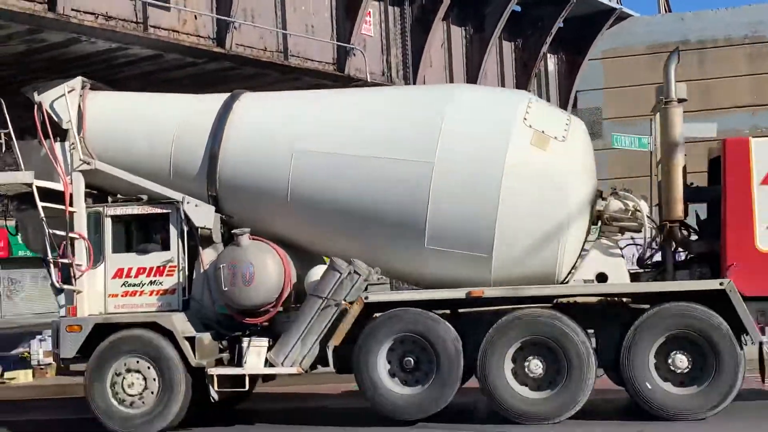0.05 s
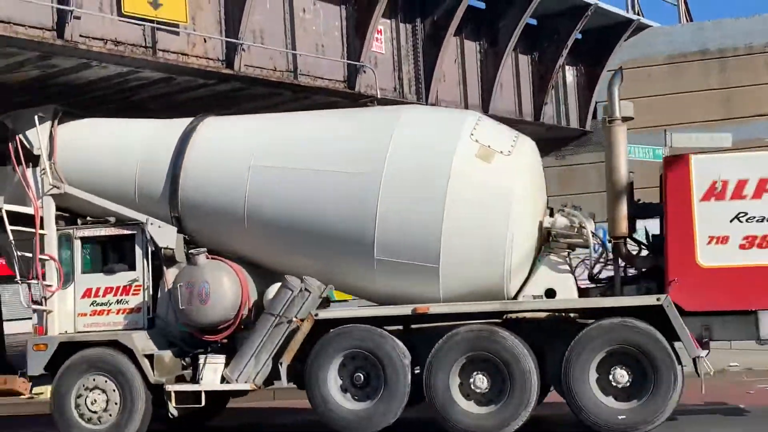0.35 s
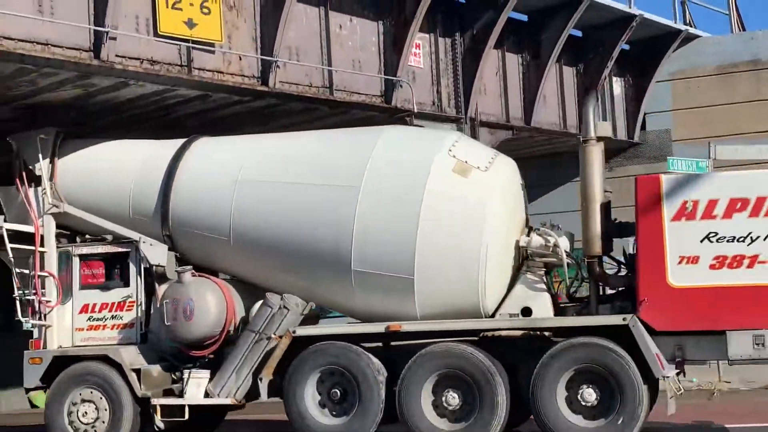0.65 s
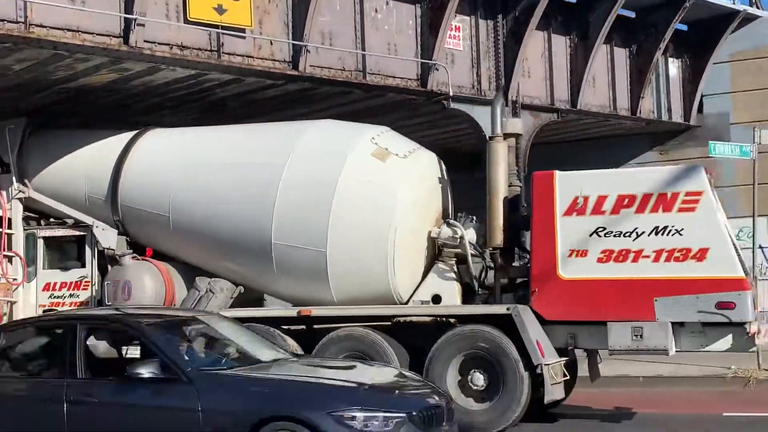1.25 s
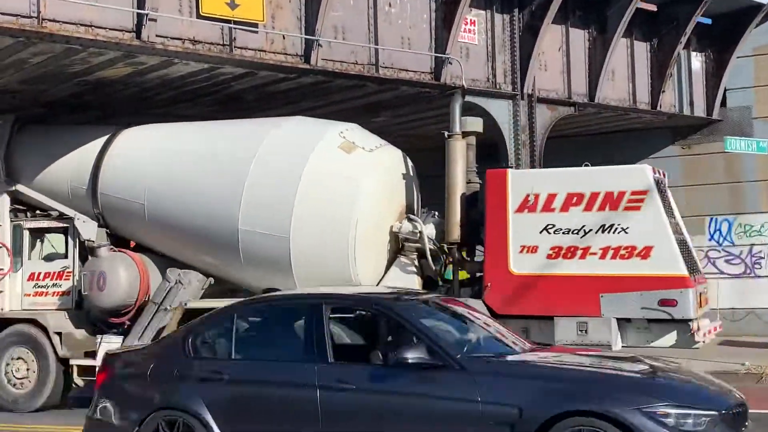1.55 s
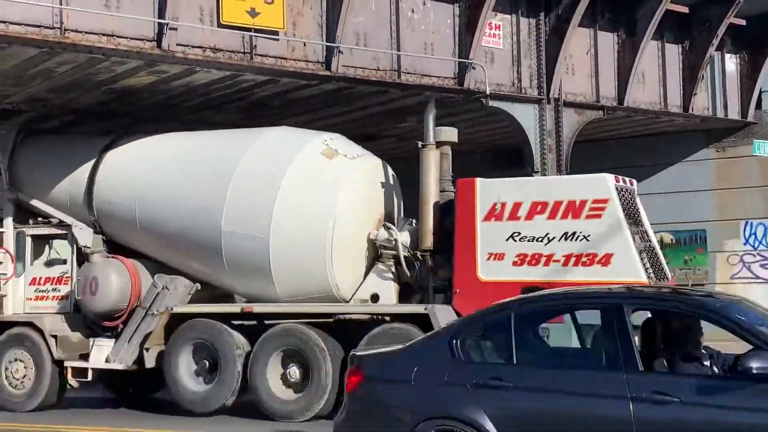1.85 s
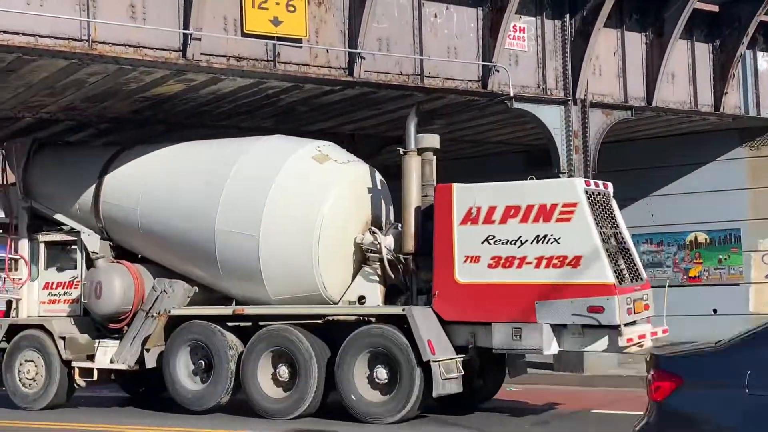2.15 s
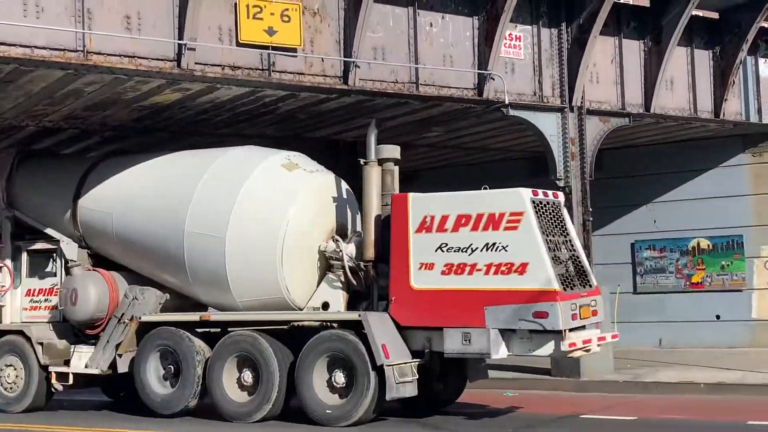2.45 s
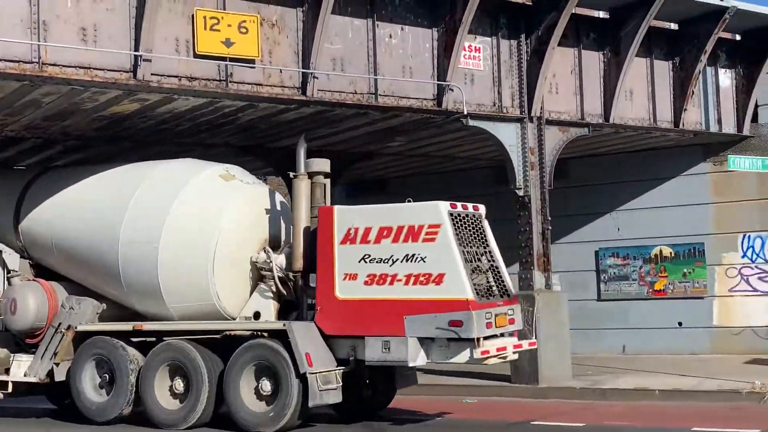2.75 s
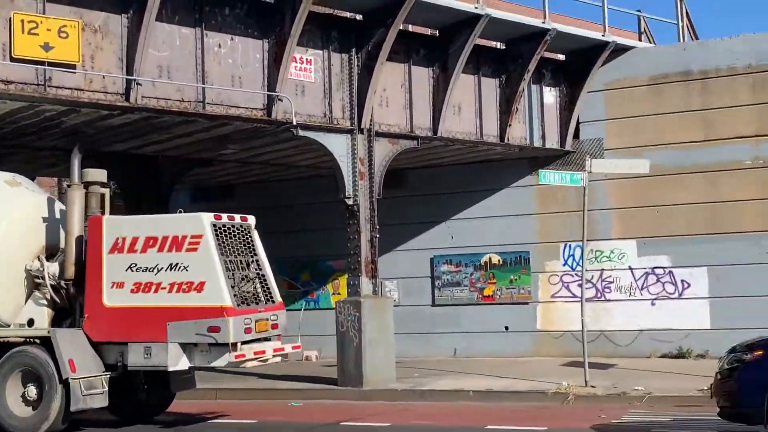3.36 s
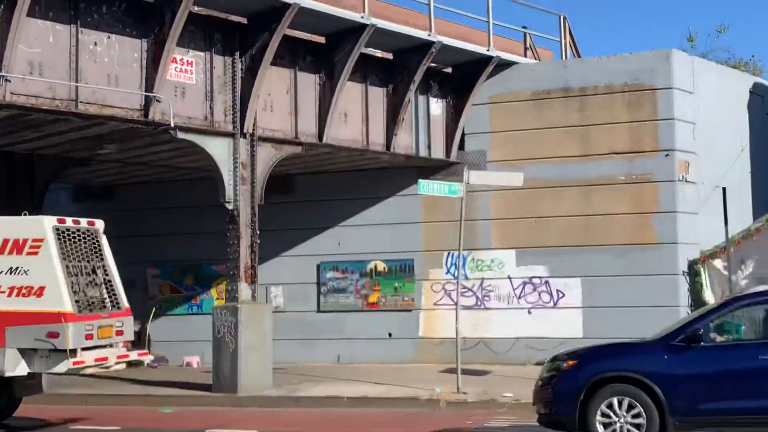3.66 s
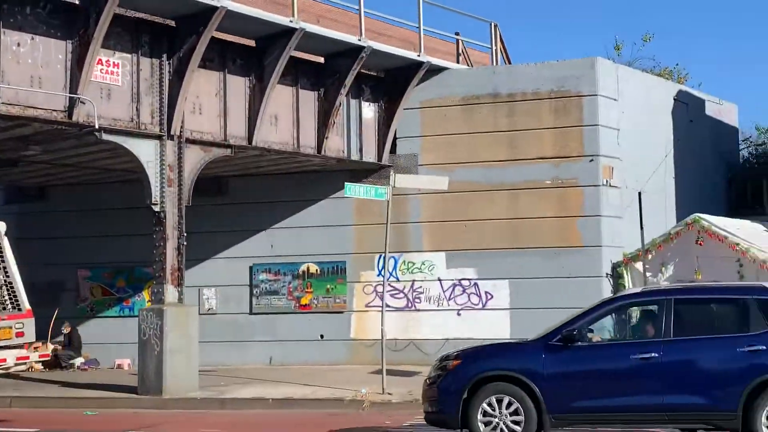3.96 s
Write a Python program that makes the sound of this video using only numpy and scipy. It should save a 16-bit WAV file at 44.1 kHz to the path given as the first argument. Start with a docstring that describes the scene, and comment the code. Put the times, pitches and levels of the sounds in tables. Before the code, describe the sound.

A heavy truck's engine throbs and rattles over tyre noise on a street under an overpass. Heard from the roadside, a car burbles past with sharp pops, followed by an air hiss, faint brake squeal and a second car's hum.

```python
"""A deep exhaust throb and engine clatter over road rumble: a diesel mixer truck rolls slowly past.
Its firings make the throb and pulse the engine noise; loose steel rattles, brakes squeal, air hisses.
A saloon overtakes close by, its burble and pops exciting the resonances of silencer and tailpipe,
and a second car hums and whines in at the end. Tyre noise fills the street, and a steel overpass
reflects the engines and rattles, all heard from a phone on the pavement."""
import sys
import numpy as np
from scipy import signal
from scipy.fft import rfft, irfft
from scipy.io import wavfile

SR = 44100
rng = np.random.default_rng(int(sys.argv[2]) if len(sys.argv) > 2 else 0)


def store_wav(level_fs):
    """Save 16-bit WAV to argv[1]."""
    pcm = np.round(np.clip(np.atleast_2d(level_fs), -1, 1) * 32767)
    wavfile.write(sys.argv[1], SR, pcm.T.astype(np.int16))


N = 176400
T = np.arange(N) / SR
FREQ = np.maximum(np.arange(N // 2 + 1) * SR / N, 1)
CAR_WOBBLE, TICK_RISE_S = .005, .0017  # fractional pitch drift of the cars; rise of a knock or tick

# truck exhaust: t/s, firing f/Hz, fundamental level/dB, overtone level/dB
TRUCK_EXHAUST = [(0, 64.9, -26, -33), (.6, 63.55, -24.5, -32.5), (1.05, 62.86, -24.5, -26),
                 (1.65, 61.38, -25, -26), (2.3, 60.4, -28.5, -30), (2.8, 59.9, -32.5, -30.5),
                 (4, 58.94, -41, -36)]
# road rumble, tyre roar, and fan and tyre hiss: t/s, level/dB
RUMBLE_LEVEL = [(0, -25.5), (.9, -23), (2.05, -23.5), (2.6, -22), (3.1, -24), (3.5, -22), (4, -26.5)]
ROAR_LEVEL = [(0, -30), (.5, -31), (1, -28.5), (1.5, -30), (2.6, -31.5), (3.2, -32), (3.6, -35)]
HISS_LEVEL = [(0, -39), (1.05, -36), (1.95, -40), (2.15, -35), (2.7, -37.5), (3.1, -39.5), (3.6, -38)]
# their spectra: f/Hz, relative spectral level/dB
RUMBLE_SPECTRUM = [(15, -26), (25, -19), (42, 1), (60, -3.5), (100, 1.5), (140, -4.5), (200, -2.5),
                   (260, -10.5), (340, -13), (450, -15.5), (700, -19), (1500, -63)]
ROAR_SPECTRUM = [(100, -65), (300, 0.5), (520, -4), (660, -1.5), (830, 2), (1050, -1.5), (1400, -8.5),
                 (1900, -7.5), (2600, -12), (3300, -18.5), (5000, -24), (9000, -35.5)]
HISS_SPECTRUM = [(1000, -6.5), (2500, 4.5), (3400, 2), (4250, 4), (5400, -4), (7000, -0.5), (9800, -7.5),
                 (12300, -14.5), (15000, -48)]
# coherence of the street noise: f/Hz, left-right correlation
STREET_COHERENCE = [(30, 0.84), (150, 0.81), (300, 0.92), (550, 0.44), (1000, 0), (2000, 0.19),
                    (4000, 0.088)]
# resonances of the engine and its cover: f/Hz, width/Hz, relative level/dB
BLOCK_MODES = [(341, 83, 5.5), (795, 120, 0.5), (1225, 66, -3.5), (1605, 110, 0.5), (1762, 82, -5),
               (2650, 160, -12), (4360, 99, -9.5)]
# engine noise, louder once the rear grille faces the pavement: t/s, level/dB
ENGINE_LEVEL = [(0, -36), (1, -38), (1.7, -42.5), (2.3, -34.5), (3.2, -37), (4, -40)]
# loose chains and chutes: t/s, level/dB
JINGLE_LEVEL = [(0, -55.5), (1.9, -60), (2.2, -53), (3.4, -57)]
# overtaking saloon: t/s, firing f/Hz of one cylinder bank, level/dB
SALOON_DRONE = [(.85, 66, -47), (1.06, 65.4, -20.5), (1.45, 63.4, -28.5), (1.87, 62.48, -22.5),
                (2.15, 58, -64)]
# exhaust burbles: t/s, nominal length/s, boom level/dB, bark level/dB, bark f/Hz, bark spread/octaves
EXHAUST_BURBLES = [(1.048, 0.062, -17, -23.5, 700, 0.43), (1.102, 0.087, -17, -30, 754, 0.42),
                   (1.232, 0.079, -20.5, -32, 640, 0.81), (1.31, 0.06, -14, -24.5, 754, 0.21),
                   (1.386, 0.024, -21, -22, 850, 0.54), (1.479, 0.09, -18.5, -30, 640, 0.12),
                   (1.528, 0.04, -18.5, -25.5, 744, 0.17), (1.594, 0.048, -17, -24.5, 610, 0.49),
                   (1.666, 0.03, -22.5, -35, 650, 0.33), (1.749, 0.042, -19, -25.5, 530, 0.85),
                   (1.792, 0.065, -19.5, -27.5, 460, 0.29), (1.877, 0.058, -21, -29, 670, 0.12)]
# silencer boom: f/Hz, relative spectral level/dB
SILENCER_SPECTRUM = [(15, -52), (70, -11), (120, 1), (200, 1), (255, -8), (350, -17), (600, -33),
                     (1200, -78)]
# tailpipe resonances: f/Hz, width/Hz, relative level/dB
TAILPIPE_MODES = [(452, 28, 1), (652, 28, 2), (745, 110, -6), (885, 90, -4)]
# soft, deep thumps and air buffets as the traffic passes: t/s, f/Hz, level/dB
LOW_THUMPS = [(1.33, 68.8, -25), (1.58, 43.88, -20), (1.705, 51.2, -16), (1.9, 75.3, -20),
              (3.82, 105.4, -17)]
# chassis rattles: t/s, level/dB, centre f/Hz, decay/s
CHASSIS_RATTLES = [(1.386, -31, 8900, .003), (1.683, -38, 6600, .003), (3.01, -34.5, 7500, .014),
                   (3.11, -37.5, 10200, .016), (3.152, -37.5, 8410, 0.012), (3.333, -36, 7000, 0.026),
                   (3.425, -35.5, 7000, 0.012), (3.749, -36.5, 6960, 0.0039), (3.982, -35, 7400, 0.0091)]
# single loud exhaust pops: t/s, pipe resonance f/Hz, level/dB
EXHAUST_POPS = [(1.388, 645, -31), (1.392, 449, -20.5), (1.524, 654, -12.5), (1.606, 451, -16)]
# second car: t/s, firing f/Hz, level/dB at f, level/dB at 1.5 f, level/dB at 2 f
CAR_ORDERS = [(2.1, 77.84, -55, -60, -38), (2.65, 78.5, -41, -57, -27), (3.0, 79.34, -32, -62, -57),
              (3.35, 79.76, -26.5, -42, -46), (3.55, 80.27, -26, -36, -26), (4, 82.4, -30, -32, -30)]
# its gear whine, rising as it pulls away: t/s, f/Hz, level/dB
GEAR_WHINE = [(2.9, 297.4, -63), (3.12, 323.4, -35), (3.45, 376, -41), (3.75, 392, -62)]
# brake squeals: t/s, hold/s, f/Hz, level/dB, fade/(dB/s), fractional pitch waver
BRAKE_SQUEALS = [(2.363, 0.11, 6950, -44, 25, 0.001), (2.519, 0.82, 9150, -43.5, 8, 0.00308),
                 (3.469, .12, 9070, -54, 25, .003), (2.467, .12, 15650, -46, 60, 0.005),
                 (3.599, .07, 14800, -45, 90, .012)]
# escaping brake air: f/Hz, relative spectral level/dB
AIR_SPECTRUM = [(1500, 2.5), (7000, -4), (10000, -6.5), (12500, -13)]
# balance of the phone's microphones: f/Hz, left minus right level/dB
MIC_BALANCE = [(110, -.6), (300, 1.3), (2500, 1.1), (3700, -.4), (5700, -3), (7200, 0)]


def undb(db):
    """Amplitude ratio of a level in decibels."""
    return 10 ** (np.asarray(db) / 20)


def unit(x):
    """Normalisation to rms 1."""
    return x / np.sqrt(np.mean(x ** 2))


def curve(rows):
    """Linear interpolation in time of each column of a table."""
    times, *columns = np.array(rows).T
    return [np.interp(T, times, c) for c in columns]


def across(rows):
    """Interpolation of a table over log frequency."""
    hz, value = np.array(rows).T
    return np.interp(np.log(FREQ), np.log(hz), value)


def shape(x, gain):
    """Filtering by multiplication of the spectrum."""
    return irfft(rfft(x) * gain, N)


def hump(hz, octaves):
    """Gaussian passband in log frequency."""
    return np.exp(-.5 * (np.log2(FREQ / hz) / octaves) ** 2)


def resonance(hz, width):
    """Response of a damped oscillator, 1 at its peak."""
    return 1 / (1 + 1j * (FREQ / hz - hz / FREQ) * hz / width)


def drift(rate_hz):
    """Low-pass noise: a smooth fluctuation of rms 1."""
    return unit(shape(rng.standard_normal(N), np.exp(-.5 * (FREQ / rate_hz) ** 2)))


def phase_of(hz):
    """Phase as the time integral of frequency."""
    return 2 * np.pi * np.cumsum(hz) / SR


def envelope(start, rise, hold, decay):
    """Linear rise, hold and exponential decay."""
    return np.clip((T - start) / rise, 0, 1) * np.exp(-np.maximum(T - start - rise - hold, 0) / decay)


def burst(x, env):
    """Amplitude gating, with rms 1 at the top of the envelope."""
    return unit(x * env) * np.sqrt(np.mean(env ** 2))


def street_noise(spectrum):
    """Partially coherent stereo noise, alike on both sides in the bass and diffuse above."""
    coherence = across(STREET_COHERENCE)
    gain = undb(across(spectrum))
    mid, side = (shape(rng.standard_normal(N), gain * np.sqrt(1 + s * coherence)) for s in (1, -1))
    return unit(np.array([mid + side, mid - side]))


def truck_exhaust(wobble=.0091, scatter_db=1, rolloff=2.05):
    """Nearly periodic diesel firings give a throbbing harmonic series; also returns the firing phase."""
    hz, fundamental_db, overtone_db = curve(TRUCK_EXHAUST)
    phase = phase_of(hz * (1 + wobble * drift(5.3)))
    firing_db = scatter_db * rng.standard_normal(N // 100)
    strength = undb(np.interp(phase / (2 * np.pi), np.arange(len(firing_db)), firing_db))
    overtones = unit(sum(np.cos(k * phase) / k ** rolloff for k in range(2, 12)))
    return -strength * (undb(fundamental_db) * unit(np.cos(phase)) + undb(overtone_db) * overtones), phase


def road(firing_phase, pulse_depth=.13):
    """Broadband rumble, tyre roar and hiss; the firings modulate the amplitude of the roar."""
    rumble = street_noise(RUMBLE_SPECTRUM) * undb(curve(RUMBLE_LEVEL)[0] + .7 * drift(25))
    roar = street_noise(ROAR_SPECTRUM) * undb(curve(ROAR_LEVEL)[0] + .82 * drift(23))
    hiss = street_noise(HISS_SPECTRUM) * undb(curve(HISS_LEVEL)[0] + 1.5 * drift(27))
    return rumble + roar * (1 + pulse_depth * np.cos(firing_phase)) + hiss


def engine_block(firing_phase, pulse_depth=.14):
    """Forced vibration: injector and gear noise, pulsing with the firings, drives engine and cover."""
    drive = rng.standard_normal((2, N)) * (1 + pulse_depth * np.cos(firing_phase))
    power = sum(undb(db) ** 2 * np.abs(resonance(hz, width)) ** 4 for hz, width, db in BLOCK_MODES)
    return unit(shape(drive, np.sqrt(power))) * undb(curve(ENGINE_LEVEL)[0])


def clatter(per_s=150, centre_hz=1600, octaves=.55, decay_s=.02, scatter_db=2.5, re_roar_db=-7.5):
    """Impact excitation: machinery knocks ring briefly at random pitches, the higher ones weaker."""
    count = int(per_s * N / SR)
    t = T[:SR // 10]
    env = np.minimum(t / TICK_RISE_S, 1) * np.exp(-t / decay_s)
    out = np.zeros((2, N + len(t)))
    for (when, *turns), (pitch, size) in zip(rng.random((count, 3)), rng.standard_normal((count, 2))):
        i = int(when * N)
        hz = centre_hz * 2 ** (octaves * pitch)
        ring = np.sin(2 * np.pi * (hz * t + np.array(turns)[:, None]))
        out[:, i:i + len(t)] += undb(scatter_db * (size - pitch)) * ring * env
    return unit(out[:, :N]) * undb(curve(ROAR_LEVEL)[0] + re_roar_db)


def jingle(per_s=23, centre_hz=8800):
    """Random impacts: chains and chutes chink faintly as the truck rocks."""
    impacts = (rng.random(N) < per_s / SR) * rng.random(N)
    env = signal.fftconvolve(impacts, envelope(0, rise=.008, hold=0, decay=.016))[:N]
    band = shape(rng.standard_normal((2, N)), hump(centre_hz, octaves=.3))
    return unit(env * band) * undb(curve(JINGLE_LEVEL)[0])


def saloon(flutter_db=2):
    """Harmonics 2 and 3 of a six-cylinder engine's bank rate, falling in pitch as it overtakes."""
    hz, db = curve(SALOON_DRONE)
    phase = phase_of(hz * (1 + CAR_WOBBLE * drift(22)))
    return undb(db) * unit(sum(np.sin(k * phase) * undb(flutter_db * drift(19)) for k in (2, 3)))


def burble(pop_hz=124.26, jitter=.057, scatter_db=3, weak_db=-4.5, cutoff_hz=1020):
    """Source and filter: runs of strong and weak pops boom in the silencer and ring the tailpipe."""
    pipe = sum(undb(db) * resonance(hz, width) for hz, width, db in TAILPIPE_MODES)
    pipe /= np.sqrt(1 + (FREQ / cutoff_hz) ** 20)
    silencer = undb(across(SILENCER_SPECTRUM))
    k = np.arange(40)
    out = 0
    for start, length, boom_db, bark_db, hz, octaves in EXHAUST_BURBLES:
        late, size = rng.standard_normal((len(k), 2)).T
        times = start + (k + .5 + jitter * late) / pop_hz
        pops = np.zeros(N)
        pops[(times * SR).astype(int)] = undb(scatter_db * size + weak_db * (k % 2))
        drive = pops * np.sqrt(SR / pop_hz) + rng.standard_normal(N)  # pulses plus gas noise
        env = envelope(start, rise=.008, hold=length / 2, decay=.016 + length / 4)
        out += undb(boom_db) * burst(shape(drive, silencer), env)
        out += undb(bark_db) * burst(shape(drive, pipe * hump(hz, octaves)), env)
    return out


def low_thumps(width_s=.016):
    """Gaussian pressure pulses: soft, deep thumps and air buffets as the traffic passes."""
    out = 0
    for when, hz, db in LOW_THUMPS:
        env = np.exp(-.5 * ((T - when) / width_s) ** 2)
        out += undb(db) * np.sqrt(2) * env * np.sin(2 * np.pi * (hz * T + rng.random()))
    return out


def rattles(octaves=.33):
    """Impacts of loose steel fittings on the chassis give fast-decaying bands of noise."""
    noise = rng.standard_normal((2, N))
    out = 0
    for start, db, hz, decay in CHASSIS_RATTLES:
        env = envelope(start - TICK_RISE_S / 2, TICK_RISE_S, 0, decay)
        out += undb(db) * burst(shape(noise, hump(hz, octaves)), env)
    return out


def loud_pops(rise_s=.0051, hold_s=.005, ring_db=-12):
    """Free decay: a hard puff drives one pipe resonance, which then rings on more softly."""
    out = 0
    for start, hz, db in EXHAUST_POPS:
        puff = envelope(start, rise_s, hold_s, decay=.0038)
        ring = undb(ring_db) * envelope(start, rise_s, hold_s, decay=.06)
        out += undb(db) * (puff + ring) * np.sin(2 * np.pi * hz * (T - start))
    return out


def second_car(flutter_db=2.5):
    """Engine orders: a petrol engine hums at 1, 1.5 and 2 times its firing rate, with a gear whine."""
    hz, firing_db, half_db, octave_db = curve(CAR_ORDERS)
    phase = phase_of(hz * (1 + CAR_WOBBLE * drift(2)))
    orders = ((1, firing_db), (1.5, half_db), (2, octave_db))
    drone = sum(unit(np.sin(k * phase)) * undb(db + flutter_db * drift(9.2)) for k, db in orders)
    whine_hz, whine_db = curve(GEAR_WHINE)
    whine = unit(np.sin(phase_of(whine_hz * (1 + CAR_WOBBLE * drift(20)))))
    return drone + whine * undb(whine_db + flutter_db * drift(10.3))


def brake_squeals(flicker_db=3.5):
    """Friction-excited vibration of the brake drums: thin, stuttering tones."""
    out = 0
    for start, hold, hz, db, fade, waver in BRAKE_SQUEALS:
        tone = unit(np.sin(phase_of(hz * (1 + waver * drift(88)))))
        level_db = db - fade * np.maximum(T - start, 0) + flicker_db * drift(30)
        out += tone * envelope(start, rise=.0091, hold=hold, decay=.02) * undb(level_db)
    return out


def brake_air(db=-33):
    """Turbulence: air escaping from the brakes gives a short hiss."""
    return undb(db) * envelope(start=2.433, rise=.082, hold=.091, decay=.21) * street_noise(AIR_SPECTRUM)


def overpass(x, t60_s=.59, gap_s=.015, db=-7.5):
    """Reverberation: diffuse reflections from girders and walls decay exponentially."""
    tail = rng.standard_normal((2, N)) * undb(-60 * T / t60_s) * (T > gap_s)
    return undb(db) * signal.fftconvolve(x * np.ones((2, 1)), unit(tail) / np.sqrt(N), axes=1)[:, :N]


def scene(engine_echo_db=-9):
    """Superposition of all sources; the engine tones, pops and rattles also reverberate."""
    exhaust, firing_phase = truck_exhaust()
    engines = exhaust + saloon() + second_car()
    transients = burble() + loud_pops() + clatter() + rattles() + jingle()
    direct = road(firing_phase) + engine_block(firing_phase) + brake_air() + brake_squeals() + low_thumps()
    return direct + engines + transients + overpass(transients + undb(engine_echo_db) * engines)


def record(dry, shared_above_hz=7330, lag_s=.000183, top_hz=15800):
    """Crossfeed and low-pass: the phone feeds the right-hand treble to both sides, late on the left."""
    left, right = rfft(dry)
    shared = 1 / (1 + (shared_above_hz / FREQ) ** 20)
    delay = np.exp(-2j * np.pi * FREQ * lag_s)
    left = np.sqrt(1 - shared) * left + np.sqrt(shared) * right * delay
    tilt = undb(across(MIC_BALANCE) / 2)
    out = irfft(np.array([left * tilt, right / tilt]), N)
    return signal.sosfilt(signal.ellip(10, .2, 80, top_hz, fs=SR, output="sos"), out)


dry = scene()
out = record(dry)
store_wav(out)
```